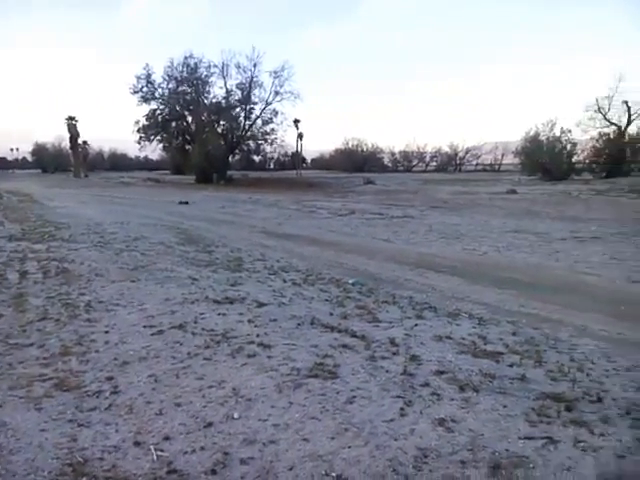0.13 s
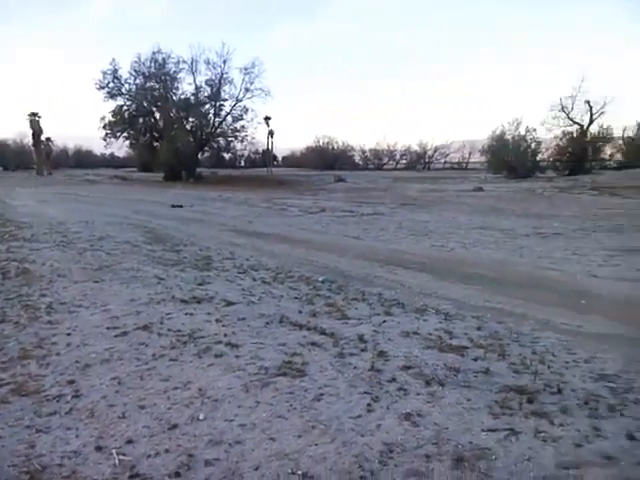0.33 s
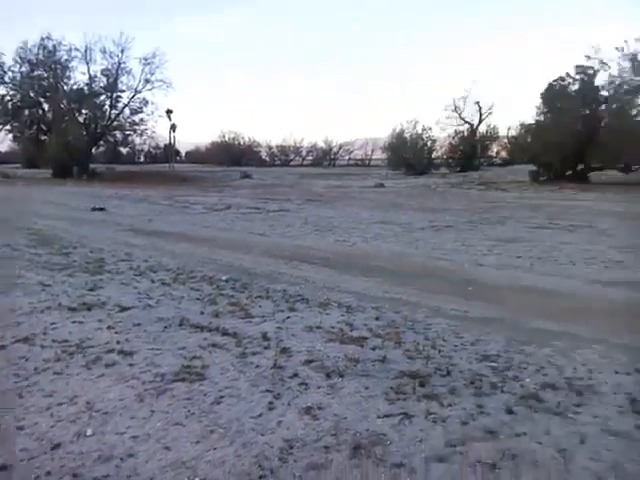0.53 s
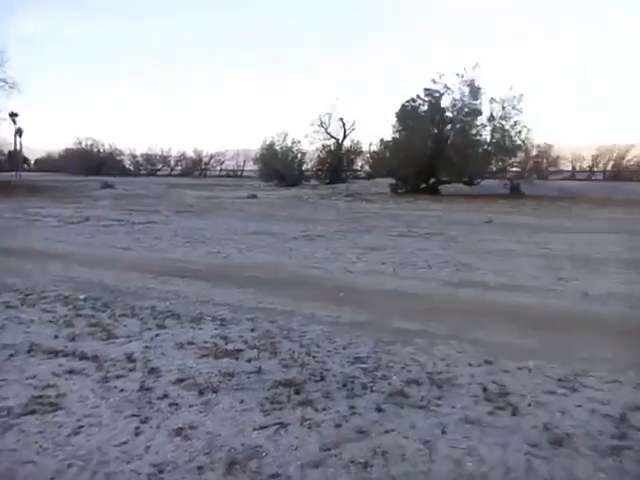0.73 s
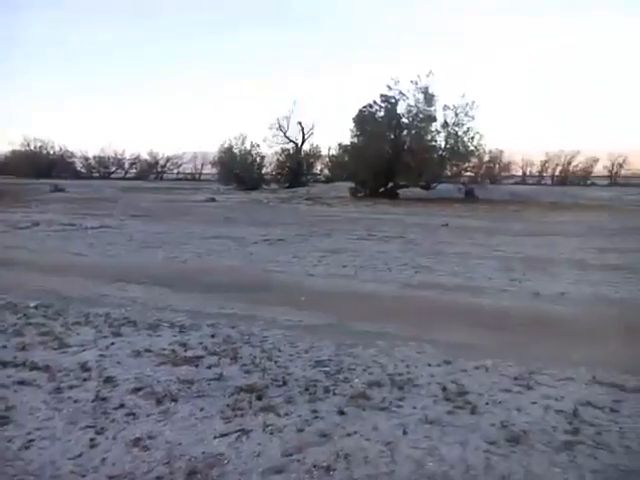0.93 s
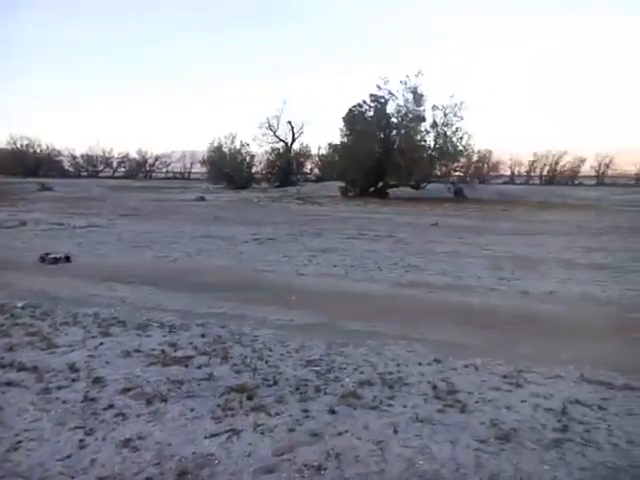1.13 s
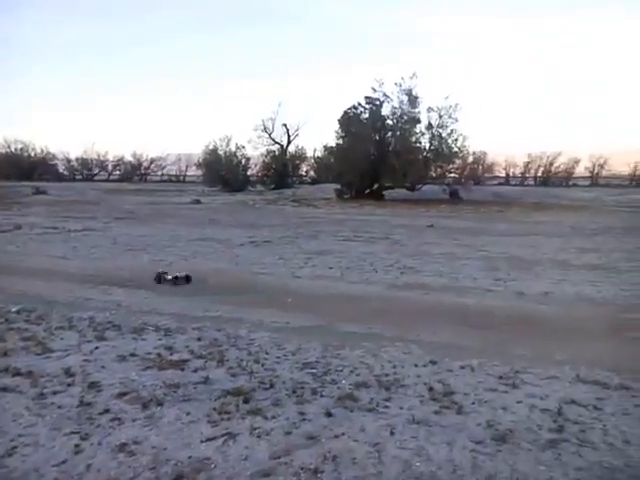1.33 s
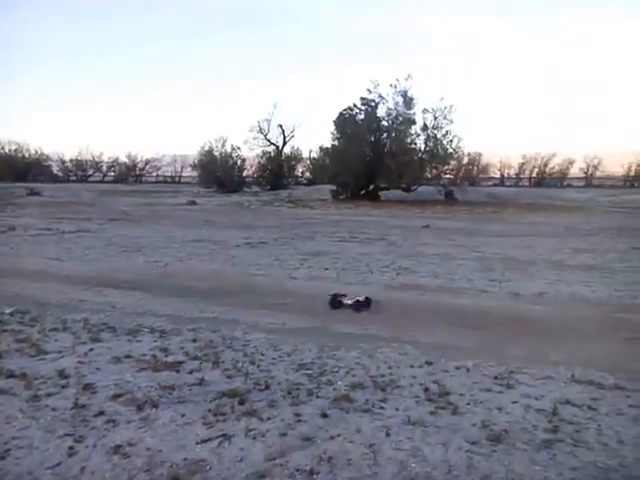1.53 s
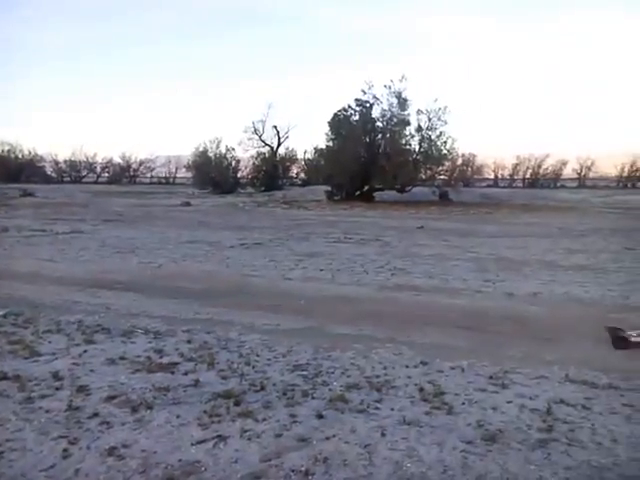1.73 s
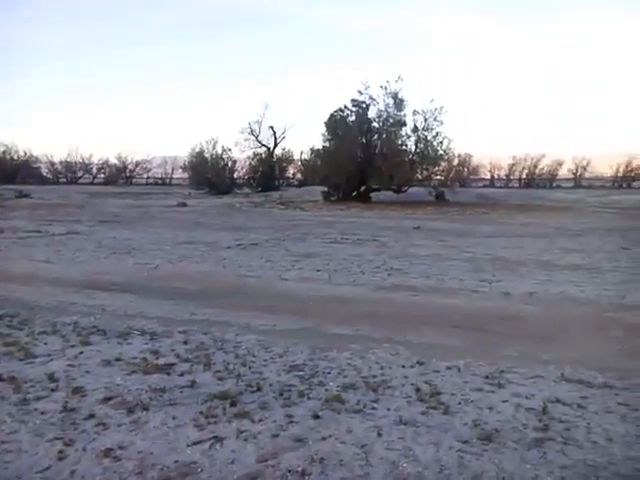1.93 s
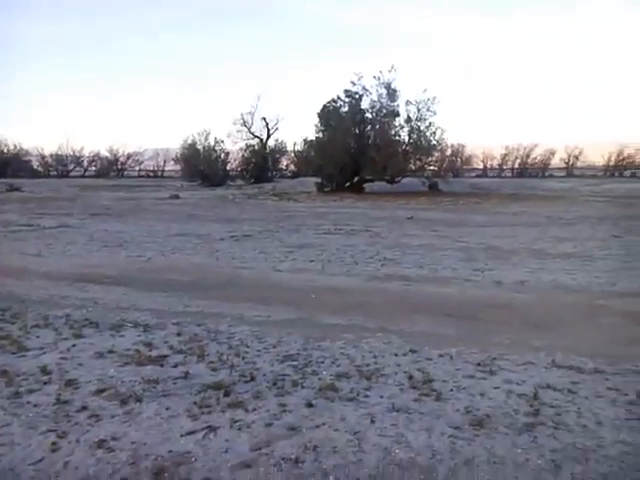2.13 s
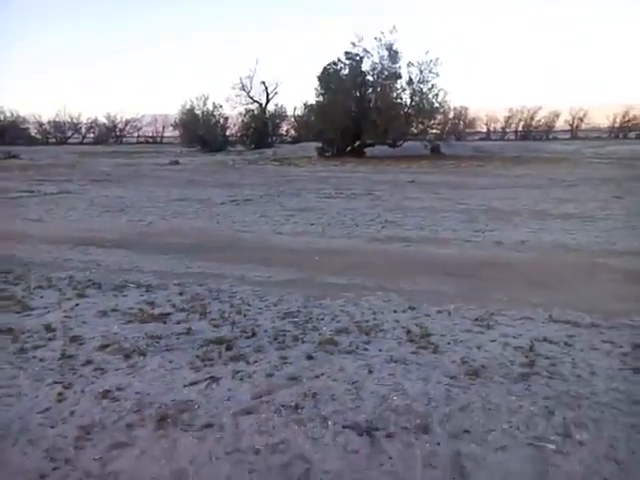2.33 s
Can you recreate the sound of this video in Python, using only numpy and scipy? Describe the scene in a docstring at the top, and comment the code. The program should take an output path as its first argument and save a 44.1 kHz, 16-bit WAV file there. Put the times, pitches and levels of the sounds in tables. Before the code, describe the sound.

A remote-control car approaches across open dirt ground, its high electric whine and hiss swelling over a faint wind rumble on the microphone. It knocks over bumps and speeds past, and two pebbles tick on its shell as it leaves.

```python
"""Light wind rumbles at first while a small electric model car races over hard dirt towards the microphone.
Its gears whine roughly over a gritty hiss, and its tyres and plastic body drum on the bumps.
A short, upside-down echo from the ground cancels some pitches of the hiss and boosts others.
As the car comes close, its speed controller whistles. It passes at about 2 s,
and two pebbles tick on its shell as it leaves."""
import sys
import numpy as np
from scipy import signal
from scipy.io import wavfile
from scipy.ndimage import map_coordinates

SR = 44100
rng = np.random.default_rng(int(sys.argv[2]) if len(sys.argv) > 2 else 0)


def waveform_to_disk(signal):
    """Save audio, clipped to [-1, 1], as 16-bit WAV at the path in sys.argv[1]."""
    frames = np.transpose(np.atleast_2d(signal))
    scaled = np.clip(frames, -1, 1) * 32767
    samples = np.round(scaled).astype(np.int16)
    wavfile.write(sys.argv[1], SR, samples)


N = 110117

# How the car's noises swell and fade: t/s, then level/dB of hiss, grit, body, tyres, low hiss
CAR_LEVELS = [(0.0, -76, -86, -67.5, -69, -82.5), (0.33, -67, -82.5, -70, -67, -75.5),
              (0.48, -66, -76, -76.5, -68.5, -76), (0.58, -68, -77, -59, -60.5, -70.5),
              (0.76, -61, -81.5, -62, -62.5, -67.5), (1.18, -59.5, -71, -55.5, -55.5, -62),
              (1.79, -48.5, -66, -47.5, -48.5, -59), (1.97, -47.5, -60.5, -48.5, -51.5, -61.5),
              (2.02, -50, -65, -59, -63.5, -63.5), (2.08, -51.5, -67.5, -45.5, -48.5, -64),
              (2.17, -56, -69, -47, -57, -57), (2.28, -60, -80, -47, -53, -63),
              (2.5, -67.5, -103, -55.5, -62.5, -69)]


def gear_whine():
    """Meshing gears sing a rough, wavering note with overtones at whole multiples of its pitch."""
    mesh = [(0, 1765, -79, -76, -76), (.2, 1770, -83, -70, -65), (.4, 1770, -85, -70, -67),
            (.56, 1800, -80, -70, -68), (.65, 1765, -70, -66, -62), (.74, 1920, -80, -68, -70),
            (.86, 1980, -71, -70, -68), (1.0, 1860, -65, -74, -70), (1.3, 1880, -58, -70, -66),
            (1.55, 1810, -57, -53, -53), (1.7, 1843, -56, -56, -54), (1.81, 1850, -52, -48, -57),
            (1.94, 1870, -52, -60, -66), (1.97, 1647, -61.5, -60, -54), (2.06, 1760, -75, -56, -53),
            (2.2, 1950, -75, -75, -61), (2.35, 2110, -90, -90, -80)]  # t/s, f/Hz, then level/dB at 1, 2 and 3 times that pitch
    roughness = [36, 85, 75]  # width/Hz of those three tones
    hz, *levels_db = in_time(mesh)
    hz = hz * (1 + .007 * drift(9.03))
    whine = 0
    for k, (db, width_hz) in enumerate(zip(levels_db, roughness), start=1):
        tone = rough_tone(k * hz, width_hz)
        just_below = from_db(-7) * rough_tone(k * hz * .955, width_hz)
        whine = whine + from_db(db) * (tone + just_below)
    return whine + from_db(levels_db[-1] - 17.5) * rough_tone(5 * hz, width_hz=50)


def drivetrain_hiss():
    """Thousands of tiny clicks from gear teeth and grit blur into a flickering hiss."""
    # Tone colour of each layer: f/Hz, relative level/dB
    hiss_colour = [(2900, 0), (3500, -3.5), (4300, -3), (5400, -2), (6400, 2.5), (7300, -12), (8000, -15),
                   (8600, -21)]
    low_colour = [(1150, 3.5), (1500, -17), (1900, -2), (2400, -16.5), (3000, 4)]
    grit_colour = [(8000, -14.5), (9500, -16), (10500, -13), (13000, -19.5), (15300, -31)]
    hiss_db, grit_db, _, _, low_db = in_time(CAR_LEVELS)
    teeth = clicks(per_s=12000, spread_db=1.6)
    hiss = from_db(hiss_db) * coloured(gear_case(teeth), hiss_colour, flicker_db=1.2)
    low_hiss = from_db(low_db + 2.5) * coloured(teeth, low_colour, flicker_db=1.2)
    grains = clicks(per_s=4000, spread_db=2.5)
    grit = from_db(grit_db) * coloured(gear_case(grains), grit_colour, flicker_db=1.1)
    return from_db(0.97 * drift(35)) * (hiss + low_hiss + grit)


def gear_case(x):
    """Part of the sound passes straight through, part makes the gear case ring."""
    rings = [(4400, -6.5), (6100, 5), (6900, -6), (7400, 5), (8100, -2), (9000, 11), (9400, 8.5),
             (9900, 11.5)]  # the case's own notes: f/Hz, relative level/dB
    width_hz = 170
    return .4 * rms_one(x) + .3 * resonate(x, [(hz, width_hz, db) for hz, db in rings])


def ground_echo(x):
    """The ground adds a slightly late, duller, upside-down copy of the sound."""
    echo = [(0, 0.96, 0.2), (.55, 0.94, 0.74), (.8, 0.86, 0.67), (1.25, 0.834, 0.42), (1.45, 0.73, 0.9),
            (1.6, 0.74, 0), (1.85, 0.63, 0.3), (1.97, 0.75, 0.2), (2.25, 0.617, 0.1), (2.5, 0.32, 0.5)]  # t/s, delay/ms, strength from 0 to 1
    delay_ms, strength = in_time(echo)
    bounced = -filtered(x, 10100, "low")
    late = map_coordinates(bounced, [np.arange(N) - delay_ms / 1000 * SR], order=3)
    return (x + strength * late) / np.sqrt(1 + strength ** 2)


def rolling():
    """Rapid knocks from the dirt shake the body and the tyres together and make both ring."""
    # The notes each part rings at: f/Hz, width/Hz, relative level/dB
    body_rings = [(238.3, 130, -4.5), (321.5, 94.5, 1.5), (424, 143, -0.5)]
    tyre_rings = [(716, 81, 4), (914, 193, 3.5), (1020, 410, -0.5)]
    _, _, body_db, tyre_db, _ = in_time(CAR_LEVELS)
    knocks = clicks(per_s=900, spread_db=1.5) * from_db(0.69 * drift(14.6))
    body = filtered(resonate(knocks, body_rings), [150, 750], "band")
    tyres = filtered(resonate(knocks, tyre_rings), [560, 1250], "band")
    return from_db(body_db) * body + from_db(tyre_db + 1.5) * tyres


def bumps():
    """A wheel hitting a bump gives a short, dull ring with a crunch of gravel."""
    hits = [(0.083, -50, 202, -29), (0.774, -51, 458, -10.5), (0.856, -42, 435, -6.5),
            (0.97, -48.5, 405, -3), (1.655, -42, 298, -17), (1.677, -36.5, 242, -20),
            (2.061, -39, 267, -31), (2.236, -34, 319, -17)]  # t/s, level/dB, f/Hz, crunch compared with the ring/dB
    rise_s, fade_s = 0.0014, 0.086
    out, t = np.zeros(N), np.arange(SR // 5) / SR
    crunches = rms_one(filtered(rng.standard_normal((len(hits), len(t))), [500, 2200], "band"))
    for (s, db, hz, crunch_db), crunch in zip(hits, crunches):
        loudness = from_db(db - 60 * t / fade_s) * (1 - np.exp(-t / rise_s))
        ring = np.sin(2 * np.pi * hz * t)
        out[int(s * SR):][:len(t)] += loudness * (ring + from_db(crunch_db) * crunch)
    return out


def pebbles():
    """Pebbles tick on the shell, each a bright puff of noise."""
    ticks = [(2.2438, -51), (2.3865, -62)]  # t/s, level/dB
    fade_s = 0.048
    out, t = np.zeros(N + SR), np.arange(SR // 5) / SR
    for s, db in ticks:
        puff = filtered(rng.standard_normal(len(t)), 4500, "high")
        out[int(s * SR):][:len(t)] += from_db(db - 60 * t / fade_s) * puff
    return out[:N]


def controller_whistle():
    """The speed controller's thin, very high tone sinks a little as the car passes."""
    whistle = [(1.3, 15000, -110), (1.65, 14500, -75), (1.88, 14800, -69), (2.12, 14400, -75),
               (2.22, 14100, -70), (2.32, 14300, -79), (2.5, 14300, -79)]  # t/s, f/Hz, level/dB
    hz, db = in_time(whistle)
    return from_db(db) * rough_tone(hz, width_hz=520)


def wind():
    """Wind on the microphone makes a low, uneven rumble."""
    gusts = [(0.0, -56.5), (0.12, -52.5), (0.5, -69.5), (0.56, -55), (0.62, -69), (1.05, -74), (1.64, -65),
             (1.65, -61), (2.5, -69.5)]  # t/s, level/dB
    colour = [(22, -12), (45, -17.5), (70, -7), (140, -1), (220, -5), (420, -17)]  # f/Hz, relative level/dB
    db, = in_time(gusts)
    return from_db(db + 3.5 * drift(13)) * coloured(rng.standard_normal(N), colour, flicker_db=1.5)


def air():
    """The faint hush of the open lot."""
    colour = [(300, -3), (1200, -12), (5000, -9), (15300, -51)]  # f/Hz, relative level/dB
    return from_db(-70.5) * coloured(rng.standard_normal(N), colour, flicker_db=5)


def from_db(db):
    """Turn decibels into a number to multiply by."""
    return 10 ** (np.asarray(db) / 20)


def rms_one(x):
    """Scale to an average strength (rms) of 1."""
    return x / np.sqrt(np.mean(np.abs(x) ** 2) + 1e-20)


def in_time(rows):
    """Join a table's rows into curves, one value a sample."""
    s, *columns = np.transpose(rows)
    return [np.interp(np.arange(N) / SR, s, c) for c in columns]


def filtered(x, hz, kind):
    """Keep the low pitches, the high ones or a band between."""
    return signal.sosfilt(signal.butter(2, hz, kind, fs=SR, output="sos"), x)


def drift(rate_hz):
    """A smooth random wander, about 1 in size."""
    r = np.exp(-2 * np.pi * rate_hz / SR)
    return rms_one(signal.lfilter([1], [1, -2 * r, r * r], rng.standard_normal(N + SR))[SR:])


def coloured(x, colour, flicker_db):
    """Split x into narrow bands of pitch, each with its own level and flicker, and mix them."""
    hz, db = np.transpose(colour)
    octaves = round(np.log2(hz[-1] / hz[0]))
    edges = np.geomspace(hz[0], hz[-1], num=3 * (octaves + 1))
    out = 0
    for k, (low, high) in enumerate(zip(edges, edges[1:])):
        band = (-1) ** k * filtered(x, [low, high], "band")
        band_db = np.interp(np.log(low * high) / 2, np.log(hz), db)
        out = out + band * from_db(band_db + flicker_db * drift(4.15))
    return rms_one(out)


def clicks(per_s, spread_db):
    """Random clicks of uneven size."""
    sizes = from_db(spread_db * np.minimum(rng.exponential(1, N), 5)) * rng.choice([-1, 1], N)
    return sizes * (rng.random(N) < per_s / SR) + 1e-18


def resonate(x, rings):
    """Let x ring several notes at once; narrower ones ring longer."""
    out = 0
    for k, (hz, width_hz, db) in enumerate(rings):
        r = np.exp(-np.pi * width_hz / SR)
        gain = (1 - r * r) / 2
        ring = signal.lfilter([gain, 0, -gain], [1, -2 * r * np.cos(2 * np.pi * hz / SR), r * r], x)
        out = out + (-1) ** k * from_db(db) * ring
    return rms_one(out)


def rough_tone(hz, width_hz):
    """A gliding tone whose strength and timing wander at random."""
    wander = drift(width_hz) + 1j * drift(width_hz)
    return rms_one(np.real(wander * np.exp(2j * np.pi * np.cumsum(hz) / SR)))


def scene():
    """The car over wind and air, in one channel."""
    background = wind() + air()
    drivetrain = gear_whine() + ground_echo(drivetrain_hiss())
    return (drivetrain + rolling() + bumps() + pebbles() + controller_whistle() + background)[None]


def record(dry):
    """Steeply cut the very highest pitches."""
    cutoff_hz = 15100
    return signal.sosfilt(signal.ellip(12, .5, 70, cutoff_hz, fs=SR, output="sos"), dry)


dry = scene()
out = record(dry)
waveform_to_disk(out)
```